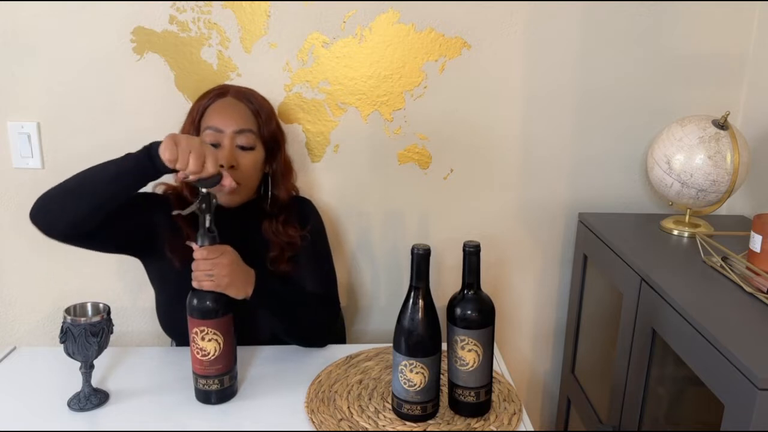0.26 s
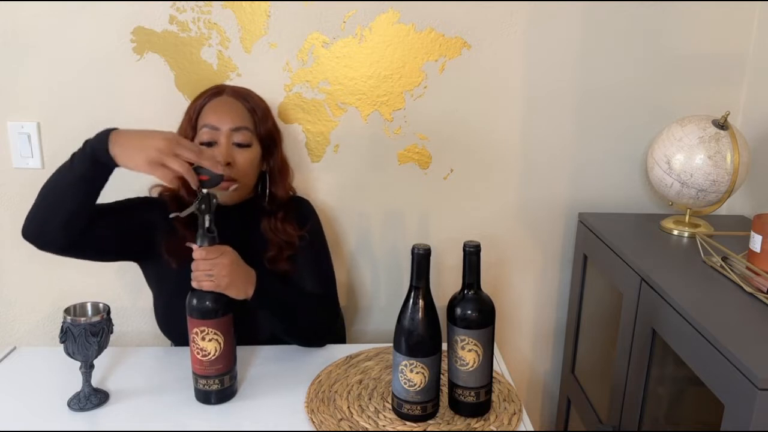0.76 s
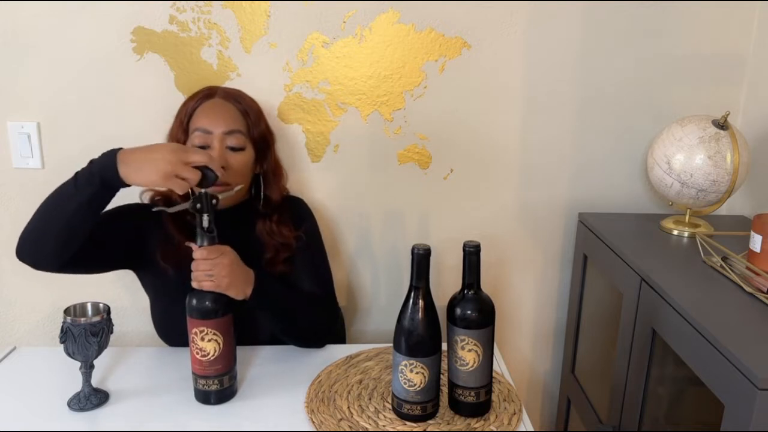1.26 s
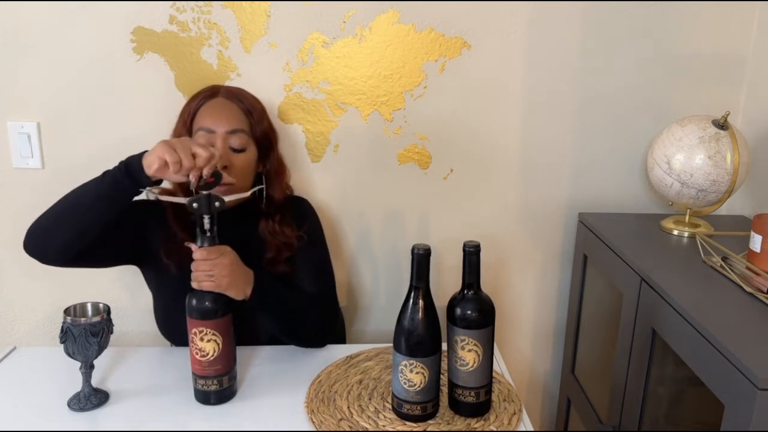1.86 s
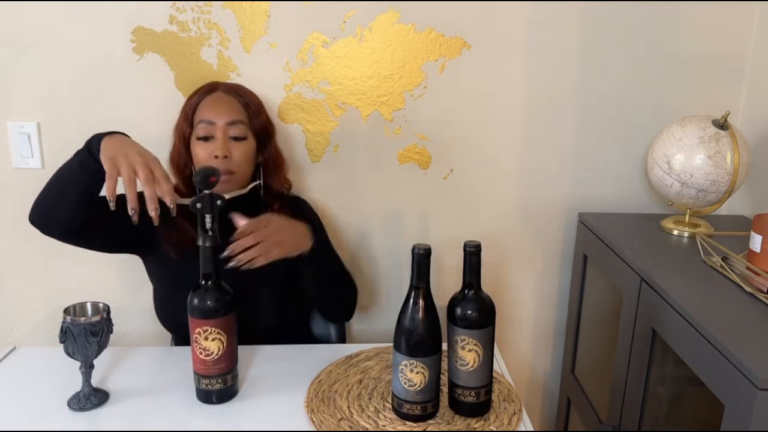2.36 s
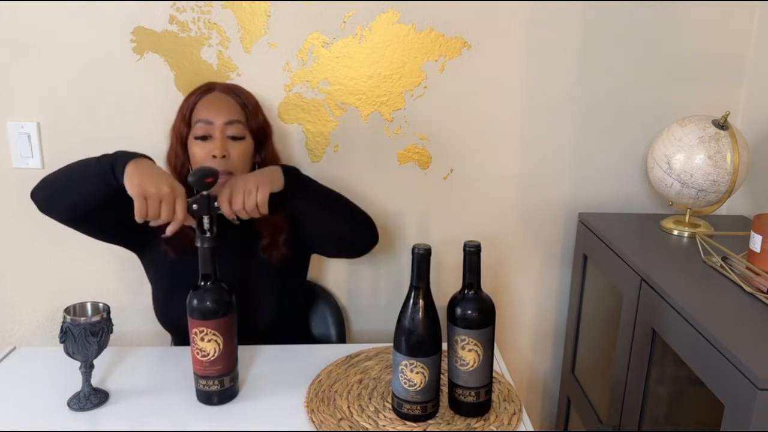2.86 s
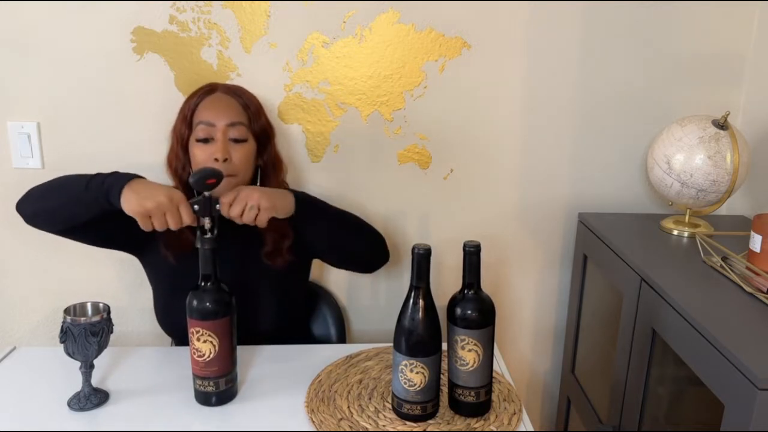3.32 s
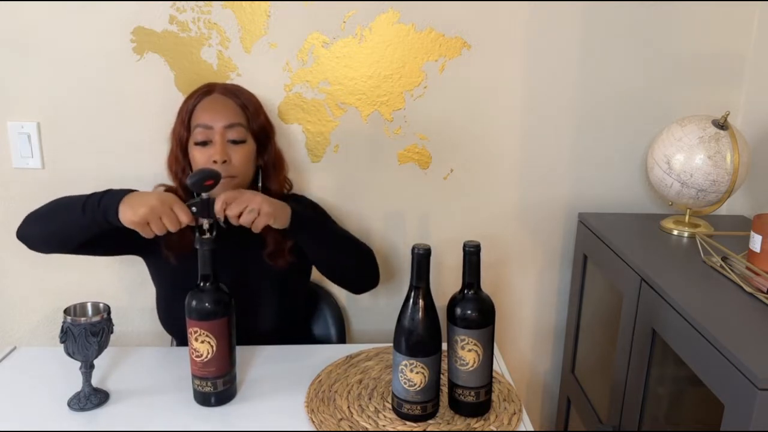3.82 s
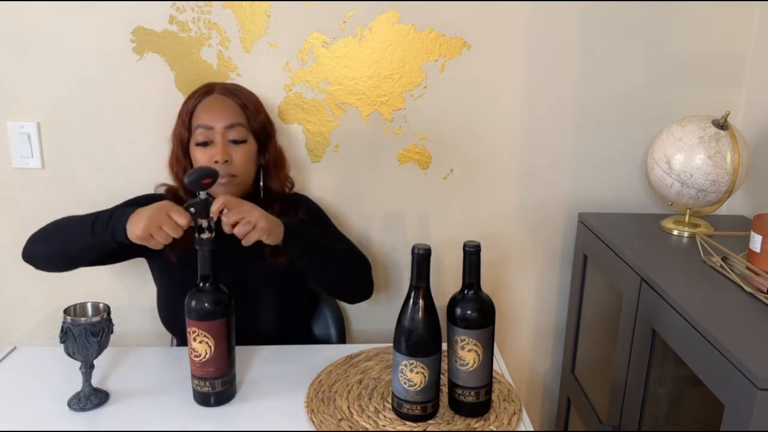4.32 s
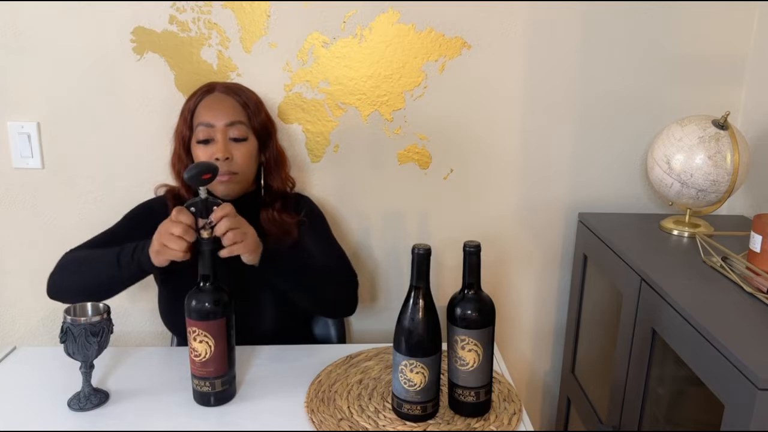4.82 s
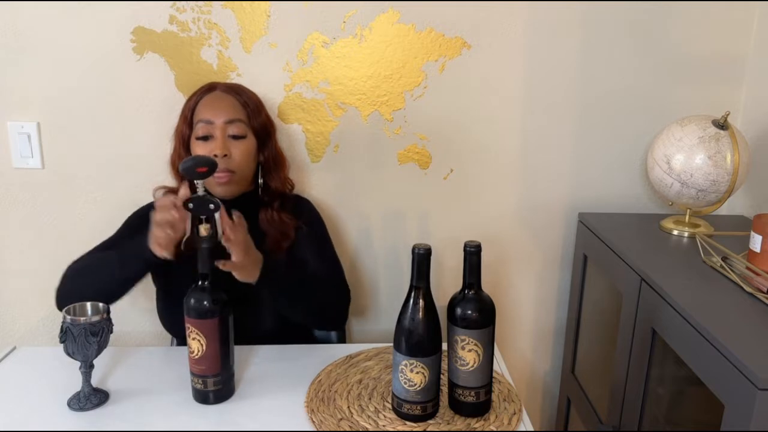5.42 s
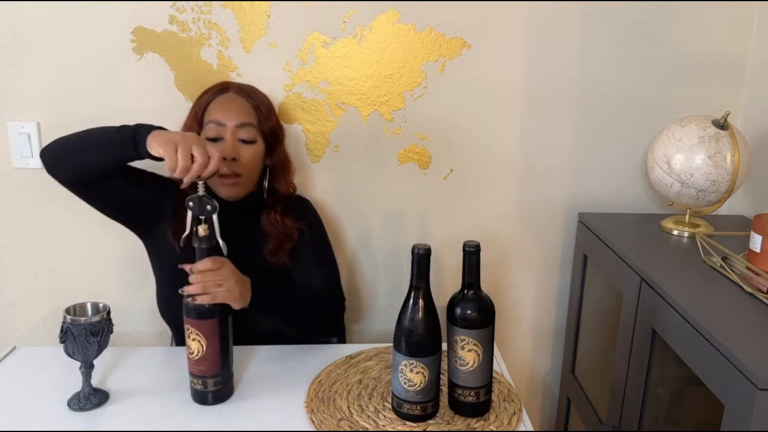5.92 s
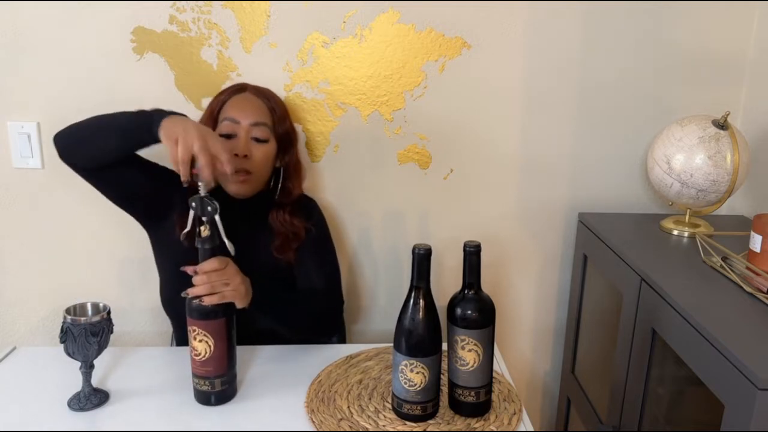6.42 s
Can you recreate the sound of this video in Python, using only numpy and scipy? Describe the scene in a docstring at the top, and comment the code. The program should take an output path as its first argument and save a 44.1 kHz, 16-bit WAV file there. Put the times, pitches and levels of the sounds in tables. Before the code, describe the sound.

In a small, lively room, a corkscrew is twisted into a wine bottle with faint grainy rubbing and light metal ticks, while an engine drones and rumbles low through the walls. The engine fades just after two seconds, leaving hum and hiss. Sparse clicks follow, then busier bright clacks and hollow bottle knocks on the table near five to six seconds, heard by one microphone across the table.

```python
"""Close on a table in a small, live room: a winged corkscrew goes into a wine bottle and its levers are pressed down.
Hum tones and noise hiss lie underneath throughout. From the start an engine drones outside, dulled by the walls, as
crank orders over rumble and roar; it fades just after two seconds. Meanwhile screw and fingers rub as grainy noise,
and metal clicks begin, as pulses with ringing modes; one dry tick decays at 1.4 s. Then the bottle knocks on the
table as softer pulses with table modes, the base scuffs as resonant noise, and late bumps thud as short low sines."""
import sys
import numpy as np
from scipy import signal
from scipy.fft import rfft, irfft, next_fast_len
from scipy.io import wavfile

SR = 44100
rng = np.random.default_rng(int(sys.argv[2]) if len(sys.argv) > 2 else 0)


def pcm_store(signal):
    """Save signal as 16-bit PCM."""
    levels = np.round(np.clip(np.atleast_2d(signal), -1, 1) * 32767)
    wavfile.write(sys.argv[1], SR, levels.astype(np.int16).T)


N = 294588
TIME = np.arange(N) / SR   # s into the scene
SIZE = 32768   # samples in one event
AGE = np.arange(SIZE) / SR   # s since an event began
HZ = np.maximum(np.arange(SIZE // 2 + 1) * SR / SIZE, 1)   # frequencies of an event's spectrum

# gears, levers and bottle neck clicking; each click also jolts the bottle:
# [t/s, level/dB, brightness/dB per octave, f/Hz of the part that rings,
#  ring level/dB relative to the click before a common lift, extra snap of the direct sound/dB]
METAL_CLICKS = [(0.0991, -65.5, -9, 3235, -14, 8.5), (0.3213, -60, 7, 3235, -31, -4),
                (0.727, -69, -8.5, 3905, -13, 1.5), (1.314, -64, -7, 3235, -13, 1.5),
                (1.9799, -71.5, -8, 3235, -13, 8.5), (2.0444, -74, -5, 3500, -13, 4),
                (2.2094, -62, -17, 2221, -28, -6), (2.4265, -68.5, -9, 2221, -20, 5.5),
                (2.723, -45.5, -1, 3905, -20.5, -2.5), (4.135, -67.5, -1.5, 3745, -6, 3),
                (4.577, -55.5, -5.5, 4990, -13, 4), (4.8429, -52.5, -2, 2221, -14, -3),
                (4.8757, -56.5, -1.5, 6760, -34, 5.5), (5.1572, -46, -5.5, 3745, -23.5, -4),
                (5.2432, -52.5, -12, 1680, -14.5, -3), (5.6255, -61.5, -5.5, 3745, -27, -6),
                (5.9392, -62, 1, 4990, -24, -6), (5.9887, -48, 0.5, 4764, -31, -6.5),
                (6.1366, -68.5, 1, 4990, -24, -7), (6.334, -48.5, -0.5, 6130, -16, 0.5),
                (6.3679, -52.5, 0.5, 6264, -29, -8), (6.4233, -50.5, -18, 1680, -26, -3),
                (6.6057, -62, -12, 3500, -26, -7)]


def from_db(db):
    """Decibels to gain."""
    return 10 ** (np.asarray(db) / 20)


def rms_one(x):
    """Scale to unit rms."""
    return x / np.sqrt(np.mean(x ** 2) + 1e-20)


def energy_one(x):
    """Scale to unit energy."""
    return x / np.sqrt(np.sum(x ** 2) + 1e-20)


def in_time(rows):
    """Each column of a curve at every sample."""
    s, *columns = np.transpose(rows)
    return [np.interp(TIME, s, column) for column in columns]


def during(rows, fade_s):
    """One while a curve lasts, fading at both ends; a curve from the very start has no fade in."""
    start, end = rows[0][0], rows[-1][0]
    fade_in = np.clip((TIME - start) / fade_s + (start < fade_s), 0, 1)
    fade_out = np.clip((end - TIME) / fade_s, 0, 1)
    return fade_in * fade_out


def at_hz(points, hz):
    """Read a table on a log-frequency axis."""
    f, value = np.transpose(points)
    return np.interp(np.log(np.maximum(hz, 1)), np.log(f), value)


def noise(colour):
    """Noise with a given spectrum, rms 1."""
    size = next_fast_len(N)
    hz = np.arange(size // 2 + 1) * SR / size
    spectrum = rfft(rng.standard_normal(size)) * from_db(at_hz(colour, hz))
    return rms_one(irfft(spectrum, size)[:N])


def drift(rate):
    """Slow chance with spread 1, drawn anew `rate` times a second."""
    return rms_one(np.interp(TIME * rate, np.arange(8192), rng.standard_normal(8192)))


def swell(top_s, db, rise_db_per_s, fall_db_per_s):
    """A gain that climbs to its top and falls away again."""
    below_db = np.maximum(rise_db_per_s * (top_s - TIME), fall_db_per_s * (TIME - top_s))
    return from_db(db - below_db)


def add(out, s, sound):
    """Mix a sound in at a time."""
    at = int(np.clip(round(s * SR), 0, N - 1))
    out[at:at + len(sound)] += sound[:N - at]


def body_gain(colour, modes, weights, width_hz):
    """A broad colour with a resonance peak at every mode."""
    peaks = sum(w / (1 + ((HZ - hz) / width_hz) ** 2) for (hz, _, _), w in zip(modes, weights))
    return from_db(at_hz(colour, HZ)) * (1 + peaks)


def contact(gain, db, span_s):
    """A short causal pulse through a body, with the given rms level over span_s."""
    cepstrum = irfft(np.log(gain))
    cepstrum[1:SIZE // 2] *= 2      # minimum phase: nothing sounds before the touch
    cepstrum[SIZE // 2 + 1:] = 0
    pulse = irfft(np.exp(rfft(cepstrum)))
    return from_db(db) * np.sqrt(span_s * SR) * energy_one(pulse)


def ringing(modes, weights_db, rise_s):
    """Decaying modes that build up briefly, each with its own rms level and a little chance."""
    levels_db = weights_db + rng.normal(0, 1.5, len(modes))
    phases = rng.uniform(0, 2 * np.pi, len(modes))
    rings = 0
    for (hz, db, t60), level_db, phase in zip(modes, levels_db, phases):
        decay = from_db(level_db + db - 60 * AGE / t60)
        rings = rings + decay * np.sin(2 * np.pi * hz * AGE + phase)
    return np.sqrt(2) * rings * (1 - np.exp(-AGE / rise_s))


def room_decay():
    """Overlapping octave bands and how each dies away in the room."""
    # reverberation time of the room: [f/Hz, t60/s]
    room_t60 = [(100, 0.69), (400, 0.3), (1000, 0.37), (3000, 0.33), (7000, 0.39), (15000, 0.26)]
    centres = 62.5 * 2. ** np.arange(9)
    shares = np.array([np.interp(np.log(HZ), np.log(centres), row) for row in np.eye(len(centres))])
    return shares, from_db(-60 * AGE / at_hz(room_t60, centres)[:, None])


def in_room(pulse, room, thin_hz, echo_s, echo_hz, echo_db, tail_db, build_s):
    """A thin direct sound, one strong and duller bounce, and a diffuse tail, as the microphone hears them."""
    shares, decays = room
    diffuse = np.sum(irfft(shares * rfft(rng.standard_normal(SIZE))) * decays, axis=0)
    tail = from_db(tail_db) * energy_one(diffuse * (1 - np.exp(-AGE / build_s)))
    out = signal.fftconvolve(pulse, tail)[:SIZE]
    out += signal.lfilter(*signal.butter(1, thin_hz, "high", fs=SR), pulse)
    echo = signal.lfilter(*signal.butter(2, echo_hz, fs=SR), pulse)
    lag = int(echo_s * SR)
    out[lag:] += from_db(echo_db) * echo[:-lag]
    return out


def background():
    """Mains hum as wavering sines; low room air and even hiss as coloured noise."""
    # mains hum: [f/Hz, level/dB rms]
    hum_tones = [(60, -56.5), (120, -62.5), (180, -69.5), (240, -72.5), (595, -81.5)]
    # colour of the low room air: [f/Hz, relative level/dB per Hz]
    air_colour = [(15, -30), (38, 6), (100, 1.5), (160, -4.5), (250, -13), (400, -19.5), (900, -52.5)]
    # colour of the hiss: [f/Hz, relative level/dB per Hz]
    hiss_colour = [(160, -32), (300, -3.5), (500, -3), (700, -8), (1200, -10), (3000, -15.5), (6500, -19.5),
                   (8500, -24), (10300, -28), (12000, -30), (13500, -16), (14700, -17), (16000, -14.5)]
    hum = 0
    for hz, db in hum_tones:
        waver = from_db(db + 0.68 * drift(3.5))
        hum = hum + waver * np.sin(2 * np.pi * (hz * TIME + rng.random()))
    return np.sqrt(2) * hum + from_db(-59.5) * noise(air_colour) + from_db(-66.5) * noise(hiss_colour)


def engine(rows, tone, level_db, rough):
    """Low engine orders pass the wall and share one level; each wavers, and booms near a room mode."""
    boom_hz, boom_width_hz, boom_db = 100.16, 4.7, 11   # the mode lifts whichever order crosses it
    crank_hz, db = in_time(rows)
    turn = 2 * np.pi * np.cumsum(crank_hz) / SR
    tones, power = 0, 0
    for k, order_db in tone:
        nearness = 1 / (1 + ((k * crank_hz - boom_hz) / boom_width_hz) ** 2)
        gain = from_db(order_db + boom_db * nearness)
        wave = np.sin(k * turn + rng.uniform(0, 2 * np.pi))
        tones = tones + gain * (1 + rough * drift(20)) * wave
        power = power + gain ** 2
    return from_db(db + level_db) * tones * np.sqrt(2 / power) * during(rows, 0.061)


def street():
    """Beyond the walls: engine notes in three stretches of throttle, and exhaust roar over road rumble."""
    # engine in each stretch of throttle: [t/s, crank f/Hz, level/dB before the stretch's trim]
    pulling = [(0.0, 33.1, -31), (0.016, 32.2, -37), (0.278, 33.64, -27.5), (0.396, 34.14, -33),
               (0.466, 34.1, -26), (0.532, 32.95, -28), (0.57, 32.8, -40), (0.63, 30.62, -26.5),
               (0.686, 30.52, -44), (0.718, 29.64, -31.5), (0.782, 29.7, -32.5), (0.828, 30.1, -44),
               (0.9, 29.9, -54)]
    coasting = [(0.9, 31.2, -46.5), (1.046, 29.1, -38), (1.274, 30.3, -38), (1.356, 32.4, -38),
                (1.496, 21.0, -43), (1.58, 19, -37)]
    leaving = [(1.44, 38.4, -48), (1.528, 38.37, -36), (1.712, 37.74, -52.5), (1.82, 34.92, -33),
               (1.848, 34.2, -41.5), (2.012, 34.44, -28), (2.086, 35.7, -32), (2.3, 32.5, -64)]
    # engine tone in each stretch: [multiple of the crank rate, relative level/dB]
    pulling_tone = [(1, -14.5), (2, 1), (3, -12), (5, -23.5), (6, -24.5), (7, -28), (9, -29)]
    coasting_tone = [(1, -9), (2, -3.5), (3, 0.5), (4, -21), (6, -4.5), (7, -21.5), (9, -22.5)]
    leaving_tone = [(1, -9), (2, -13), (3, 3.5), (5, -13), (6, -10.5), (7, -36), (9, -28)]
    # colour of the road rumble and of the exhaust roar: [f/Hz, relative level/dB per Hz]
    rumble_colour = [(15, -39), (26, -21), (34, 0.5), (60, 9.5), (100, 1.5), (150, -11), (250, -34),
                     (500, -84)]
    roar_colour = [(70, -15), (150, 1.5), (240, 1), (350, -8), (500, -17.5), (900, -30), (2000, -50),
                   (5000, -75)]
    # exhaust roaring with each push on the throttle: [t/s at the top, level/dB, rise/dB per s, fall/dB per s]
    pushes = [(0.299, -39.5, 78, 54.5), (0.96, -48, 111, 17), (2.02, -51.5, 116, 28)]
    # the rumble is steady while the traffic is near, then fades by 59 dB per s
    rumble_db = -41.5 - 59 * np.maximum(TIME - 2.132, 0)
    rumble = from_db(rumble_db) * noise(rumble_colour)
    roar = sum(swell(*row) for row in pushes) * noise(roar_colour)
    notes = (engine(pulling, pulling_tone, level_db=0.66, rough=0.15)
             + engine(coasting, coasting_tone, level_db=3.0, rough=0.26)
             + engine(leaving, leaving_tone, level_db=-1.25, rough=0.27))
    return notes + rumble + roar


def dry_tick(fall_s=0.0019):
    """One small step that decays at once, with no room around it."""
    # the lone tick: [t/s, peak level/dB]
    tick = (1.3896, -29.5)
    tick_s, tick_db = tick
    out = np.zeros(N)
    add(out, tick_s, -from_db(tick_db) * np.exp(-AGE / fall_s))
    return out


def thuds(rise_s=0.0198):
    """The arms bump the table: soft low sines that swell and fade within a few cycles."""
    # bumps: [t/s, level/dB before a common trim, f/Hz]
    bumps = [(5.221, -29.5, 46.6), (5.284, -42, 133.7), (6.24, -51, 131.6), (6.44, -32.5, 73),
             (6.489, -40.5, 141.4), (6.58, -44.5, 118), (6.64, -39.5, 54.3)]
    out = np.zeros(N)
    envelope = (AGE / rise_s / 2) ** 2 * np.exp(2 - AGE / rise_s)   # tops out at 2 * rise_s
    for s, db, hz in bumps:
        add(out, s - rise_s, from_db(db - 4.0) * envelope * np.sin(2 * np.pi * hz * AGE))
    return out


def scuffs():
    """The glass base shifts a little and groans briefly: noise in one resonance of the table."""
    # scuffs of the base on the table: [t/s, level/dB]
    shifts = [(2.48, -65), (6.232, -57)]
    groan_hz, width_hz, spread_s = 525, 58, 0.034
    resonance = signal.iirpeak(groan_hz, groan_hz / width_hz, fs=SR)
    groan = rms_one(signal.lfilter(*resonance, rng.standard_normal(N)))
    return groan * sum(from_db(db) * np.exp(-((TIME - s) / spread_s) ** 2) for s, db in shifts)


def rubbing(slips_per_s=260, slip_db=-11.5, smooth_db=-5.0):
    """Screw in cork and fingers on the handle hiss and catch in tiny slips; strokes swell until let go."""
    # strokes: [t/s of letting go, level/dB before the slip and smooth gains, swell/dB per s]
    strokes = [(0.33, -67, 12), (0.455, -60, 149), (1.33, -71.5, 8), (2.235, -51.5, 87)]
    # colour of the rubbing: [f/Hz, relative level/dB per Hz]
    rub_colour = [(300, -11), (550, 2), (900, -9), (1500, -12.5), (3000, -14.5), (6500, -22.5),
                  (10500, -24), (12500, -32.5), (14500, -12), (16000, -12.5)]
    pressure = sum(swell(s, db, rise, fall_db_per_s=198) for s, db, rise in strokes)
    slips = (rng.random(N) < slips_per_s / SR) * rng.uniform(0.26, 1, N)
    slip_decay = np.exp(-1 / (0.0017 * SR))   # each slip dies away over 1.7 ms
    grain = rms_one(signal.lfilter([1], [1, -slip_decay], slips + 1e-18))
    return pressure * (from_db(smooth_db) + from_db(slip_db) * grain) * noise(rub_colour)


def bottle(room, peaks_db=-5.0):
    """The glass base knocks on the table top, which booms by way of the room; soft contacts lose treble."""
    # knocks: [t/s, level/dB, hardness as corner f/Hz, extra boom/dB: high landing flat, low on the edge]
    knocks = [(2.215, -47.5, 641, 4), (2.826, -43.5, 1200, 17), (2.9225, -42.5, 2230, 7),
              (3.839, -52, 3000, 5.5), (5.1571, -45.5, 1600, -7), (5.2446, -42, 2120, -2),
              (5.368, -34.5, 2500, 4), (5.407, -41, 1880, 4.5), (5.6545, -38, 1610, 1.5),
              (5.7348, -31, 2270, 2), (6.4234, -40, 695, -3)]
    # broad colour of a knock: [f/Hz, relative level/dB per Hz]
    knock_colour = [(40, -24), (90, -9.5), (130, 1.5), (175, -7.5), (235, 7), (340, -10), (410, 1.5),
                    (490, -6.5), (630, -4), (900, -13.5), (1700, -19.5), (3600, -19), (5000, -23),
                    (8000, -40), (12000, -101)]
    # modes of table and bottle: [f/Hz, level/dB over the knock's own spectrum before a common trim, t60/s]
    table_modes = [(119.1, -5.5, 0.48), (239.7, 0, 0.45), (314, 2, 0.59), (396.4, -0.5, 0.23),
                   (432.5, -2.5, 0.28), (567, 2, 0.27), (626, 5, 0.12), (1047, -3, 0.23), (1176, 8.5, 0.19),
                   (1403, -5.5, 0.22), (1737, 10, 0.077), (2370, -4, 0.14), (2780, 12.5, 0.064),
                   (3100, 0, 0.15)]
    boom_below_hz = 326
    out, mode_hz = np.zeros(N), np.array(table_modes)[:, 0]
    # every click jolts the bottle 14 ms later, 5 dB softer, with a soft contact
    jolts = [(s + 0.01436, db - 5, 525, 3.5) for s, db, *_ in METAL_CLICKS]
    for s, db, hardness_hz, boom_db in knocks + jolts:
        chance_db = rng.normal(0, 3.0, len(table_modes))
        # the stiff glass modes stand out more than the damped ones of the table
        sharp = from_db(peaks_db + chance_db) * np.minimum(mode_hz / 1100, 1)
        body = body_gain(knock_colour, table_modes, sharp, width_hz=11)
        softness = 1 / np.sqrt(1 + (HZ / hardness_hz) ** 4)
        boom = from_db(boom_db / (1 + (HZ / boom_below_hz) ** 4))
        knock = contact(body * softness * boom, db, span_s=0.006)
        # a harder knock wakes the higher modes
        drive_db = 20 * np.log10(np.interp(mode_hz, HZ, np.abs(rfft(knock))))
        heard = in_room(knock, room, thin_hz=650, echo_s=0.00774, echo_hz=1270, echo_db=2.0,
                        tail_db=4.0, build_s=0.0027)
        ring = ringing(table_modes, drive_db - 50, rise_s=0.0029)
        add(out, s, heard + ring)
    return out


def corkscrew(room, own_octaves=0.028, fall_db=10.5, peaks_db=1.0, tilt_from_hz=1500):
    """Each click is a crack coloured by the metal; the part hit rings on, and its neighbours ring less."""
    # broad colour of a click: [f/Hz, relative level/dB per Hz]
    click_colour = [(200, -31), (700, -9), (1400, -12), (2300, -4), (3100, -3), (3900, -1.5), (5000, -1),
                    (6200, -0.5), (9500, -4), (11300, -12.5), (14500, 3.5), (16000, -18.5)]
    # modes of the corkscrew and the glass neck: [f/Hz, relative level/dB, t60/s]
    metal_modes = [(1618, -5, .4), (1680, 1, .55), (2221, -2, .42), (2330, -3, .2), (2510, -4, .18),
                   (3235, -1, .2), (3500, -1, .28), (3745, -1, .36), (3905, -1, .33), (4080, 0, .36),
                   (4764, -2, .23), (4990, 1, .32), (6040, -3, .3), (6130, -2, .23), (6264, -2, .4),
                   (6430, -4, .27), (6760, -2, .25), (7170, -2, .21), (7960, -4, .2), (9394, -5, .21),
                   (14050, -2, .17)]
    other_modes_db = 7.5   # parts that were not hit ring this much softer, besides fall_db per octave
    out, mode_hz = np.zeros(N), np.array(metal_modes)[:, 0]
    octaves = np.log2(np.maximum(HZ / tilt_from_hz, 1))
    for s, db, brightness_db, ring_hz, ring_db, snap_db in METAL_CLICKS:
        struck_hz = mode_hz[np.argmin(np.abs(mode_hz - ring_hz))]
        apart = np.abs(np.log2(mode_hz / struck_hz))   # octaves from the part that was hit
        not_hit = 1 - np.exp(-(apart / own_octaves) ** 2)
        weights_db = -fall_db * apart - other_modes_db * not_hit
        chance_db = rng.normal(0, 3.0, len(metal_modes))
        peaks = from_db(peaks_db + .5 * weights_db + chance_db)
        body = body_gain(click_colour, metal_modes, peaks, width_hz=21)
        crack = contact(body * from_db(brightness_db * octaves), db, span_s=0.0069)
        heard = in_room(crack, room, thin_hz=300, echo_s=.006, echo_hz=14000, echo_db=-5.5,
                        tail_db=4.0, build_s=0.00033)
        ring = ringing(metal_modes, weights_db + db + ring_db + 7.0, rise_s=.0005)
        snap = (from_db(snap_db) - 1) * crack   # a tooth that faces the microphone is heard more directly
        add(out, s, heard + snap + ring)
    return out


def scene():
    """Everything as it reaches one microphone across the table."""
    room = room_decay()
    far = background() + street()
    sundry = dry_tick() + thuds() + scuffs()
    hands = rubbing() + bottle(room) + corkscrew(room)
    return (far + sundry + hands)[None]


def record(dry):
    """The top is cut steeply at 15.9 kHz."""
    return signal.sosfilt(signal.ellip(12, .3, 80, 15900, fs=SR, output="sos"), dry)


dry = scene()
out = record(dry)
pcm_store(out)
```